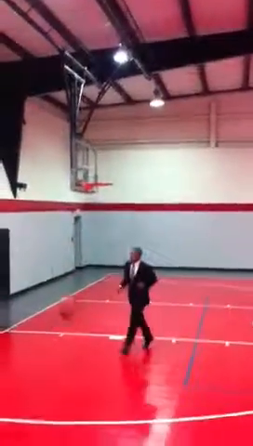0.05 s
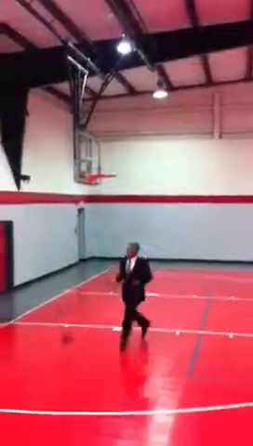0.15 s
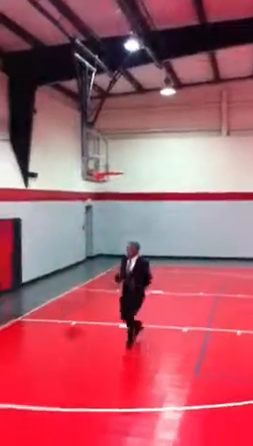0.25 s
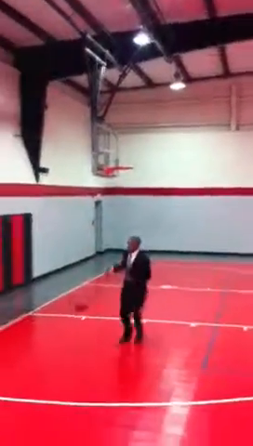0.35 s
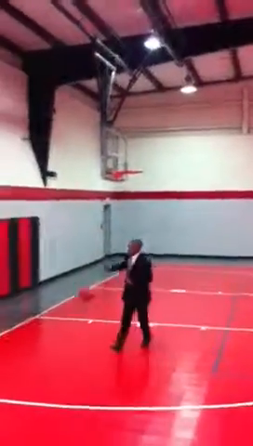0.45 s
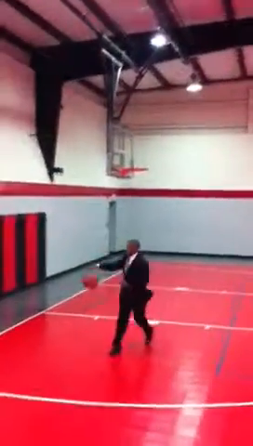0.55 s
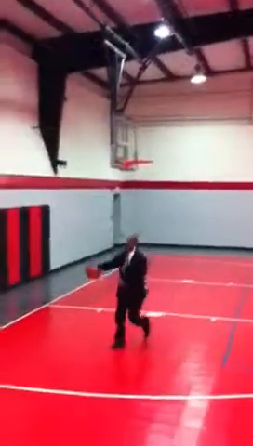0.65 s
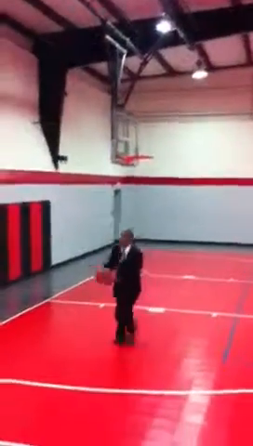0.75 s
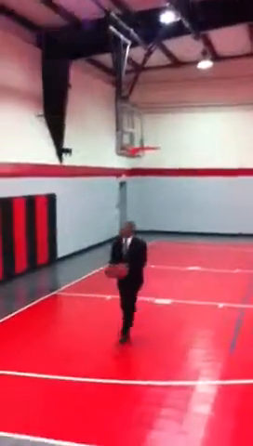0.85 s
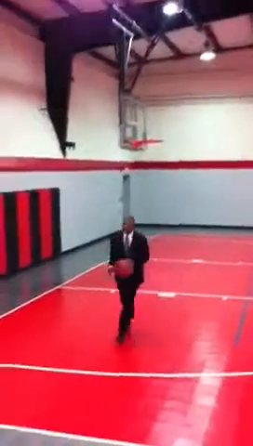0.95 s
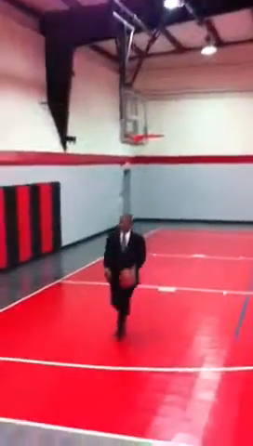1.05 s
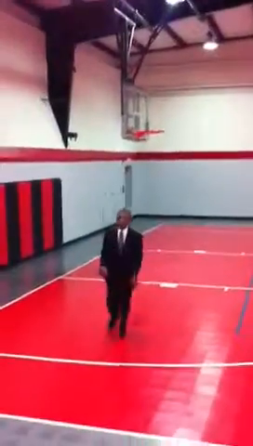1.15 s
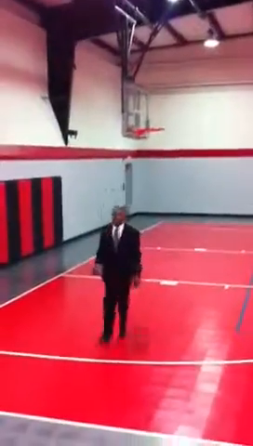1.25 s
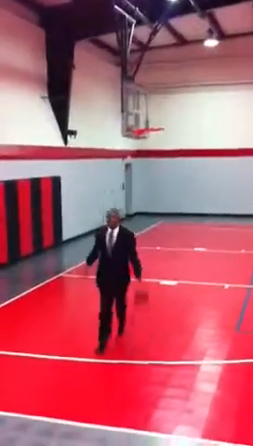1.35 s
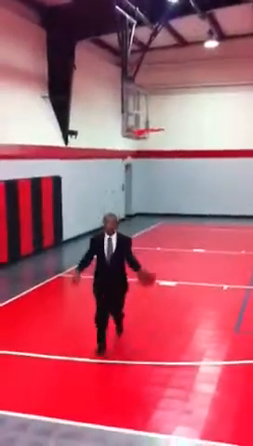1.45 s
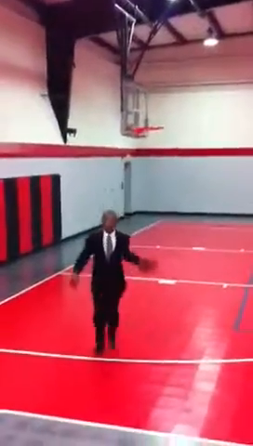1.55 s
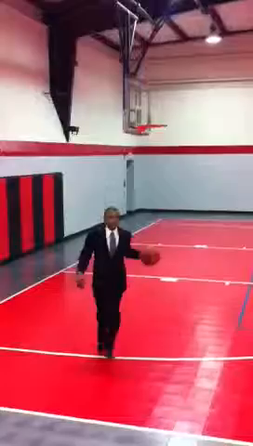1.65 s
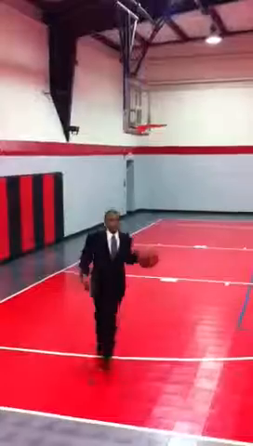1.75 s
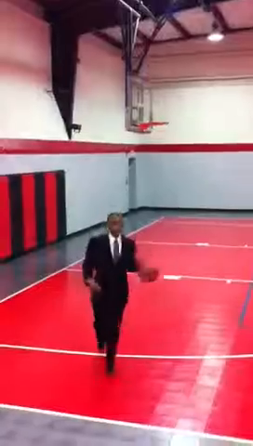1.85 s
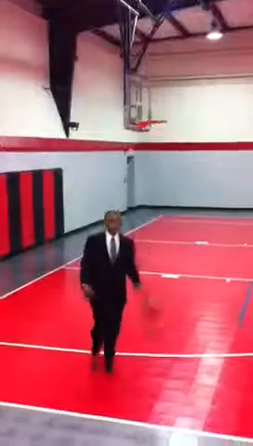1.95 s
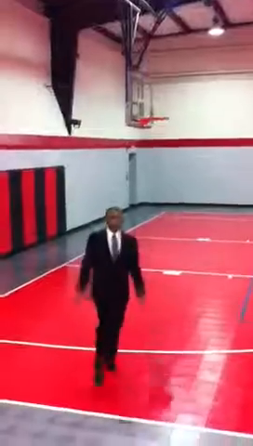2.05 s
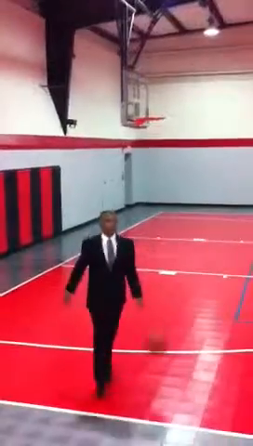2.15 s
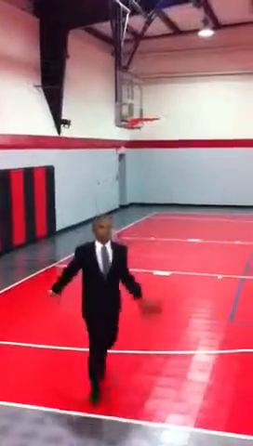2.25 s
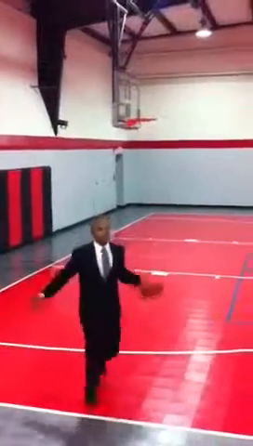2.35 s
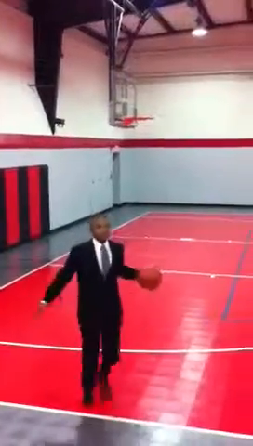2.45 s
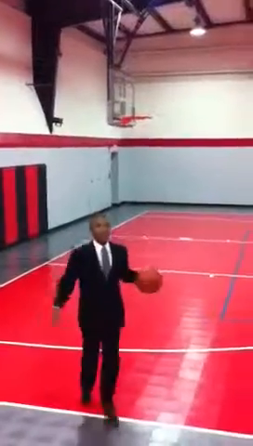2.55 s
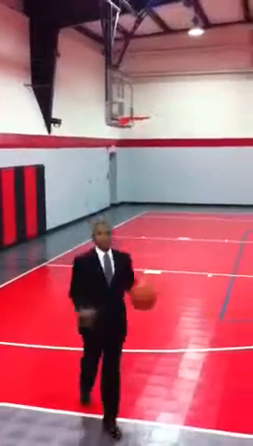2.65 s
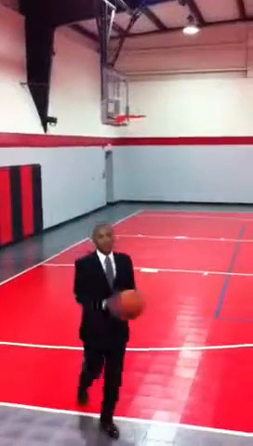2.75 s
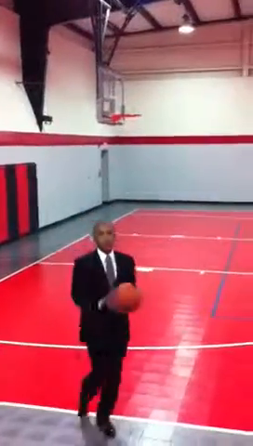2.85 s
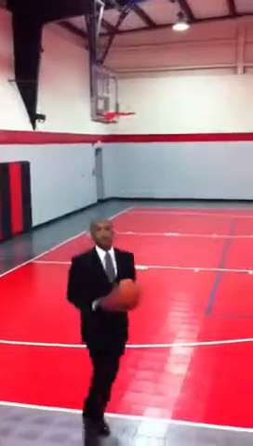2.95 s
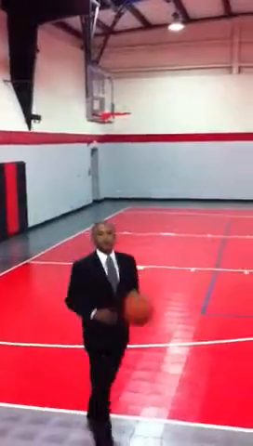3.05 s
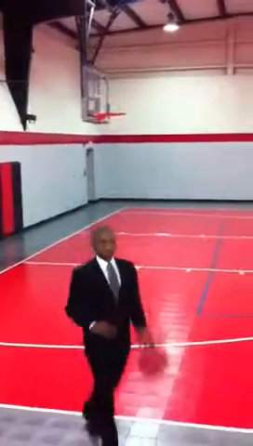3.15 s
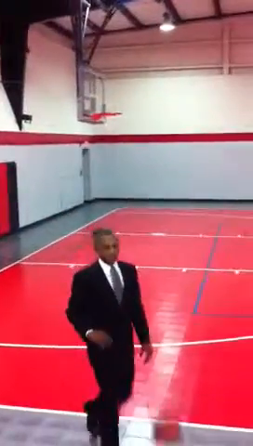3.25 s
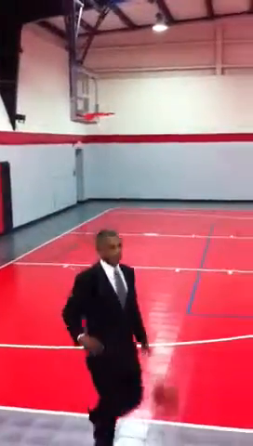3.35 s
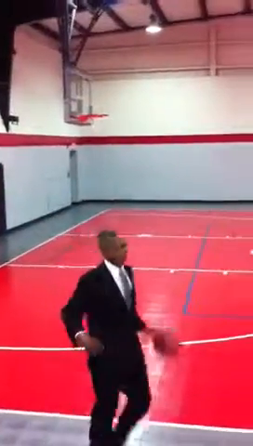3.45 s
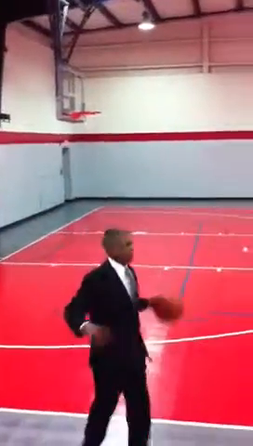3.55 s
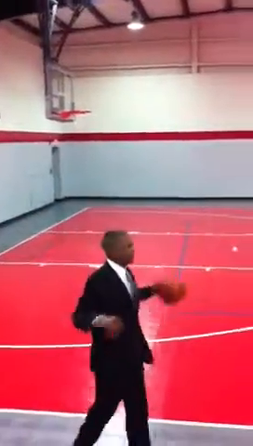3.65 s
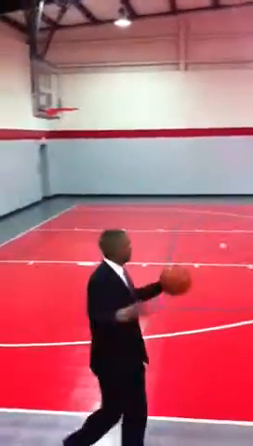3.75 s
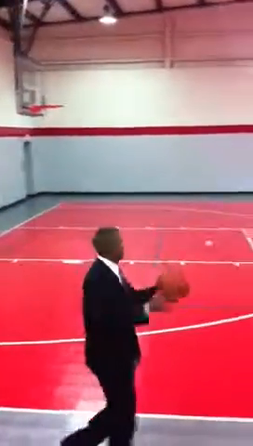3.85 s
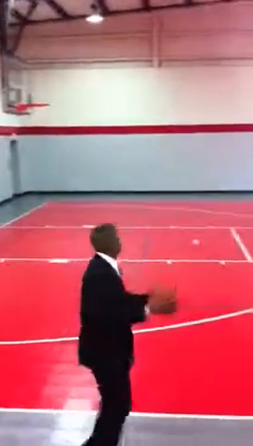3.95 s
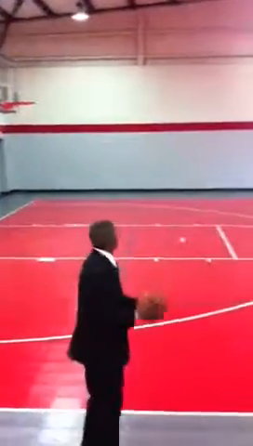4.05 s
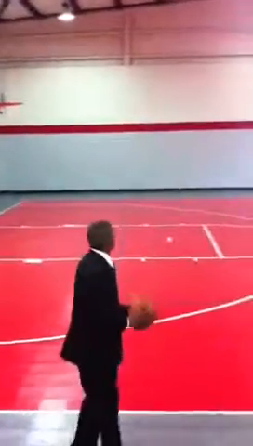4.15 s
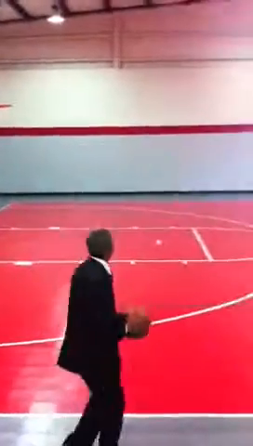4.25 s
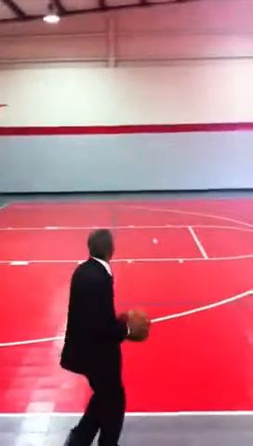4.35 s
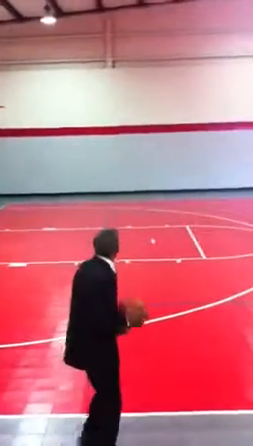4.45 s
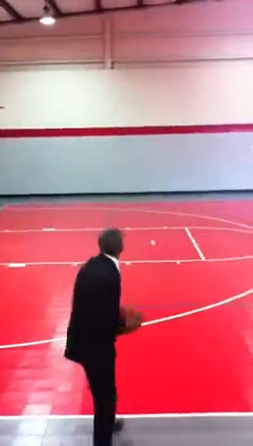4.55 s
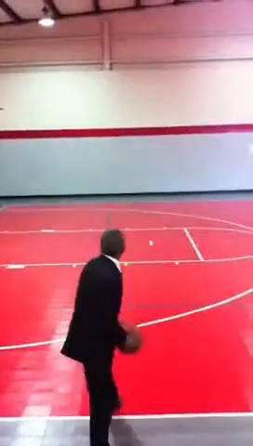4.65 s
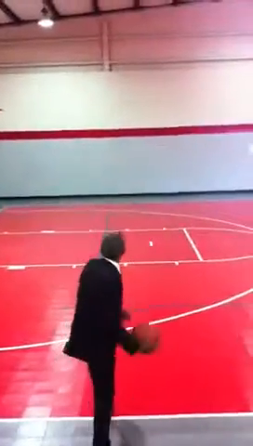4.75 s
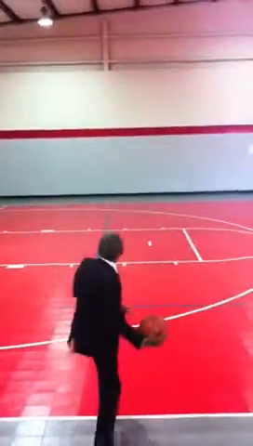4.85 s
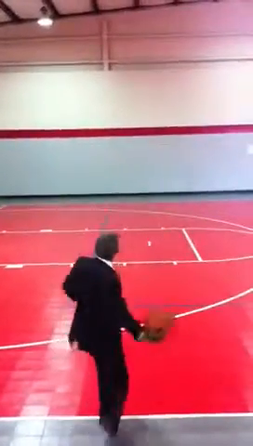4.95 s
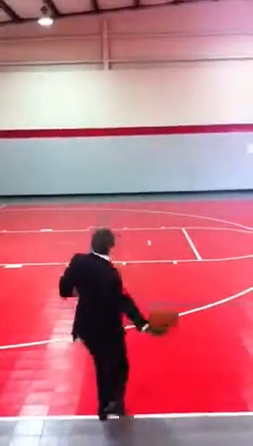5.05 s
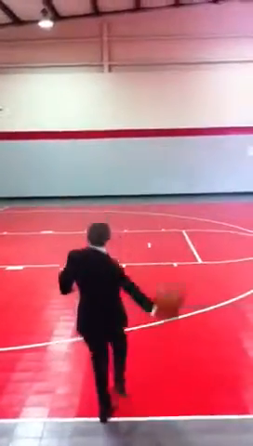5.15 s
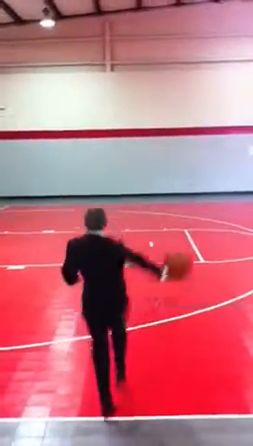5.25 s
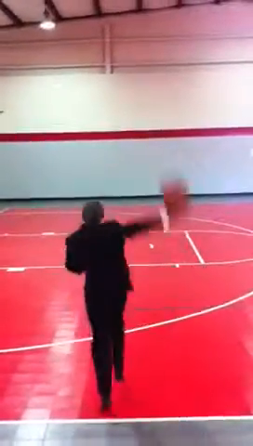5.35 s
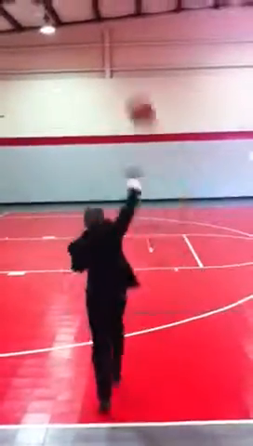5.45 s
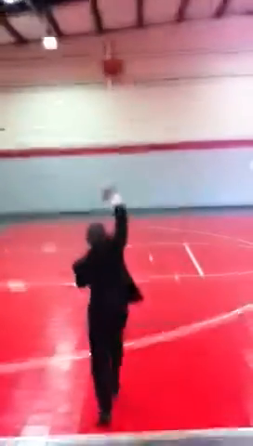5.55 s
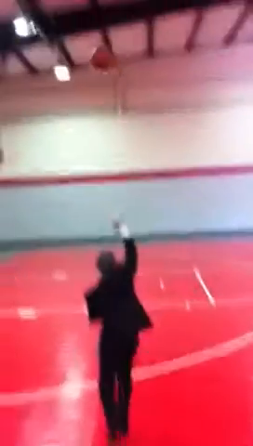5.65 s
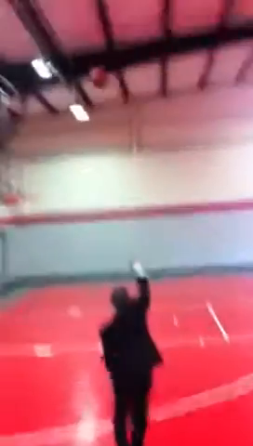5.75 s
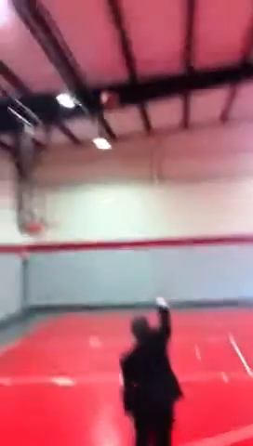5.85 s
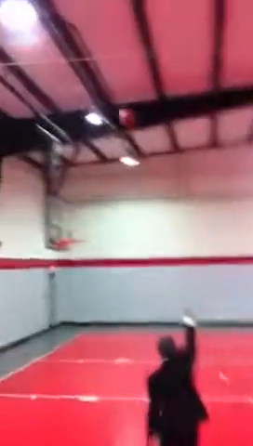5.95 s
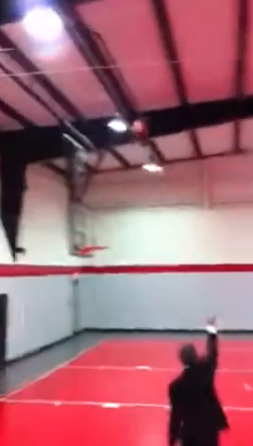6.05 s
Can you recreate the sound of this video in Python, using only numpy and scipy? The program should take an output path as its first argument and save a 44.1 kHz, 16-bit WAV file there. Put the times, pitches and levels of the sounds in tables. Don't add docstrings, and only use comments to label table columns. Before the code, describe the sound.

A basketball thumps and rings four times in a big echoing gym, with hard shoes clacking and two slapping catches over faint hum.

```python
import sys
import numpy as np
from scipy import signal
from scipy.fft import rfft, irfft, next_fast_len
from scipy.io import wavfile

SR = 44100
rng = np.random.default_rng(int(sys.argv[2]) if len(sys.argv) > 2 else 0)


def amplitude_ratio(level_db):
    exponent = np.asarray(level_db, float) / 20
    return 10 ** exponent


def wav_out(sig):
    wavfile.write(sys.argv[1], SR, np.round(np.clip(np.atleast_2d(sig).T, -1, 1) * 32767).astype(np.int16))


N = 269406

# pitch in Hz, level in dB rms.
HUM_TONES = [(118, -92.5), (120, -64), (236, -75.5), (295.5, -64.5)]
# frequency in Hz, level in dB per Hz.
NOISE_COLOUR = [(24, -27), (40, -16), (64, -24), (85, -16), (109, -8), (133, -7), (198, -7), (296, -4.5),
                (343, -10.5), (552, -16.5), (824, -16.5), (1010, -20.5), (5650, -26), (10600, -29.5),
                (15700, -27.5)]
NOISE_DB = -62.5

# frequency in Hz, time to fade by 60 dB in seconds, level in dB.
HALL_TAIL = [(61, 1.7, -10), (131, 1.5, 11.5), (254, 1.36, 1), (400, 1.02, 0.5), (700, 0.95, 8.5),
             (1150, 1.59, 8.5), (1870, 1.56, 10), (3970, 1.34, 5.5), (8000, 0.57, 39)]

# time in seconds, peak in dB, tile pitch in Hz, sole over peak in dB.
HEEL_STEPS = [(0.296, -50.5, 404, -3), (0.348, -46, 394, 1), (1.102, -54.5, 382, -18),
              (1.171, -54, 340, -11), (1.981, -54.5, 372, -0.5), (2.733, -52, 406, -24),
              (3.289, -46.5, 400, -10), (3.736, -51, 440, -7), (4.801, -52.5, 400, -15),
              (4.941, -60, 410, -20), (5.712, -47.5, 360, -20), (6.033, -55.5, 383, -18)]
# time in seconds, peak in dB, tile pitch in Hz, sole over peak in dB.
TOE_TAPS = [(1.07, -52.5, 310, -13.5), (1.909, -53.5, 360, -13), (3.36, -50.5, 434, -19),
            (4.255, -67, 350, 8), (4.312, -47, 395, -23), (4.359, -47.5, 300, -17),
            (5.046, -56.5, 377, -22)]
# time in
# seconds, peak in dB, tile pitch in Hz, sole over peak in dB, snap over peak in dB.
EDGE_STEPS = [(0.723, -48.5, 374, -1, -12), (0.858, -50.5, 424, -20, -1), (0.953, -40.5, 414, -23, -5),
              (2.839, -51, 403, 1, 5.5), (3.807, -52.5, 344, -9, 2), (4.197, -52.5, 560, -3.5, -12),
              (5.653, -49, 306, -10, 0)]

# time in seconds, thump in dB, skin slap over thump in dB,
# low air ring in Hz, high air ring in Hz.
DRIBBLES = [
    (0.3973, -39.5, 3, 704, 1400),
    (1.4047, -36, -2.5, 830, 1370),
    (2.2611, -36.5, 4, 750, 1370),
    (3.461, -36, 2.5, 790, 1230),
]
# time in seconds, thump in dB, skin slap over thump in dB,
# low air ring in Hz, high air ring in Hz.
CATCHES = [
    (2.9070, -27.5, -11, 794, 1375),
    (4.0858, -34.5, -15, 960, 1230),
    (4.0905, -39, -25, 996, 1200),
]
# thump in Hz, boom share of the thump, knock in Hz, then dB over the thump for
ON_FLOOR = (117.5, 0.37, 326.5, 8, 4.5, 4, 1, -22)
# thump in Hz, boom share, knock in Hz, then knock, low, high, top, ping in dB.
IN_HANDS = (279, 0.26, 358, 4.5, 4, 1.8, -3.5, -19.5)
# thump, knock, air and slap, all in dB.
FLOOR_TAIL = (1.8, 6, 2, 1.7)
# thump, knock, air and slap, all in dB.
HANDS_TAIL = (0.92, -1.6, -2.1, -1)
# extra path in metres, level against the blow in dB, dulling in Hz.
FLOOR_ECHOES = [(4.93, -8, 3000), (10.61, -9, 690), (15.44, -21, 1600), (69, -20, 190)]
# extra path in metres, level against the blow in dB, dulling in Hz.
HANDS_ECHOES = [(7, -9.5, 1160), (12.5, -11, 2500), (17, -24, 690)]

FAR_WALL_M, NEARING_M_PER_S, NEAREST_M = 51, 12.5, 34.3
FAR_WALL_DB, FAR_WALL_HZ = -25, 1590
SOUND_M_PER_S = 343


def rms_one(x):
    return x / np.sqrt(np.mean(x ** 2) + 1e-20)


def peak_one(x):
    return x / np.abs(x).max()


def at_hz(points, hz, column=1):
    table = np.array(points)
    return np.interp(np.log(hz + 1), np.log(table[:, 0]), table[:, column])


def add(track, sound, s):
    i = max(round(s * SR), 0)
    track[i:i + len(sound)] += sound[:N - i]


def filtered(x, order, hz, kind="low"):
    return signal.sosfilt(signal.butter(order, hz, kind, fs=SR, output="sos"), x)


def contact(length_s, rough, soft_hz):
    t = np.arange(SR * 15 // 100) / SR
    force = rough * rng.standard_normal(len(t)) * np.exp(-t / length_s)
    force[0] += 1
    return -filtered(force, 2, soft_hz)


def ring(force, hz, t60):
    decay = amplitude_ratio(-60 / (t60 * SR))
    turn = 2 * np.pi * hz / SR
    return peak_one(signal.lfilter([1, 0, -1], [1, -2 * decay * np.cos(turn), decay ** 2], force + 1e-18))


def hall_response(build_s, sources=((1,),)):
    t = np.arange(SR * 5 // 4) / SR
    hz = np.fft.rfftfreq(len(t), 1 / SR)
    colour = np.sqrt(np.sum(np.abs(rfft(sources, len(t))) ** 2, axis=0))
    noise = colour * rfft(rng.standard_normal(len(t)))
    tail = np.zeros(len(t))
    for centre in 50 * 2 ** np.arange(0, 7.6, 0.5):
        share = np.clip(1 - 2 * np.abs(np.log2((hz + 1) / centre)), 0, 1)
        fade_db = at_hz(HALL_TAIL, centre, column=2) - 60 * t / at_hz(HALL_TAIL, centre)
        tail += irfft(noise * share, len(t)) * amplitude_ratio(fade_db)
    flutter_db = 1.7 * np.interp(t, np.arange(80) / 60, rng.standard_normal(80))
    build_up = 1 - np.exp(-(t / build_s) ** 2)
    return tail * amplitude_ratio(flutter_db) * build_up / np.sqrt(SR)


def hum():
    t = np.arange(N) / SR
    waver_db = 1.26 * np.interp(t, np.arange(40) / 6, rng.standard_normal(40))
    out = np.zeros(N)
    for hz, db in HUM_TONES:
        tone = np.sin(2 * np.pi * (hz * t + rng.random()))
        out += np.sqrt(2) * amplitude_ratio(db + waver_db) * tone
    return out


def air_and_hiss():
    size = next_fast_len(N)
    colour = amplitude_ratio(at_hz(NOISE_COLOUR, np.fft.rfftfreq(size, 1 / SR)))
    noise = irfft(rfft(rng.standard_normal(size)) * colour, size)[:N]
    return amplitude_ratio(NOISE_DB) * rms_one(noise)


def footfall(peak_db, tile_hz, sole_db, snap_db, sole_hz):
    heel = contact(0.0055, 0.49, soft_hz=457)
    sole = contact(0.0044, 0.2, soft_hz=1600)
    edge = contact(0.004, 0.5, soft_hz=3000)
    knock = amplitude_ratio(peak_db + 6.5) * ring(heel, tile_hz, 0.033)
    thud = amplitude_ratio(peak_db - 5.5) * ring(heel, 228, 0.19)
    clack = amplitude_ratio(peak_db + sole_db + 8) * ring(sole, sole_hz, 0.023)
    snap = amplitude_ratio(peak_db + snap_db) * ring(edge, 1400, 0.003)
    return knock + thud + clack + snap


def steps():
    landings = [(*row, -22, 727) for row in HEEL_STEPS]
    landings += [(*row, -9, 1110) for row in TOE_TAPS]
    landings += [(*row, 730) for row in EDGE_STEPS]
    out = np.zeros(N)
    for s, *settings in landings:
        add(out, footfall(*settings), s - 0.001)
    wall_delay = SR // 45
    out[wall_delay:] += amplitude_ratio(-13.5) * out[:-wall_delay]
    return out + signal.fftconvolve(out, hall_response(0.0066))[:N]


def bounce_parts(row, kind, rough):
    s, thump_db, slap_db, low_hz, high_hz = row
    thump_hz, boom, knock_hz, knock_db, low_db, high_db, top_db, ping_db = kind
    push = ring(contact(0.001, rough / 4, soft_hz=280), thump_hz, 0.036)
    push = push + boom * ring(contact(0.0086, rough / 4, soft_hz=340), 189.6, 0.063)
    knock = ring(contact(0.0026, rough, soft_hz=695), knock_hz, 0.029)
    force = contact(0.0087, rough, soft_hz=2700)
    air = amplitude_ratio(low_db + 3.5) * ring(force, low_hz, 0.0076)
    air = air - amplitude_ratio(high_db + 2.5) * ring(force, high_hz, 0.006)
    air = air + amplitude_ratio(top_db) * ring(force, 1717, 0.0069)
    air = air + amplitude_ratio(ping_db) * ring(force, 1043, 0.19)
    slap = peak_one(filtered(contact(0.0025, 1.2 * rough, soft_hz=2790), 2, [1500, 3400], "band"))
    return amplitude_ratio(thump_db) * np.array([amplitude_ratio(12) * push, amplitude_ratio(knock_db) * knock, air, amplitude_ratio(slap_db) * slap])


def wall_echo(blow, db, dull_hz):
    smear = rms_one(contact(0.0036, 0.72, dull_hz)[:SR // 100])
    return amplitude_ratio(db) * np.abs(blow).max() * peak_one(signal.fftconvolve(blow, smear))


def ball_blows(rows, kind, tail_db, near_echoes):
    out = np.zeros(N)
    for row in rows:
        s = row[0]
        blow = bounce_parts(row, kind, rough=0.11).sum(axis=0)
        add(out, blow, s + 0.0004)
        spread = amplitude_ratio(np.array(tail_db))[:, None] * bounce_parts(row, kind, rough=0)
        add(out, hall_response(0.013, spread), s)
        far_path_m = max(FAR_WALL_M - NEARING_M_PER_S * s, NEAREST_M)
        for path_m, db, dull_hz in [*near_echoes, (far_path_m, FAR_WALL_DB, FAR_WALL_HZ)]:
            add(out, wall_echo(blow, db, dull_hz), s + path_m / SOUND_M_PER_S)
    return out


def ball():
    dribbled = ball_blows(DRIBBLES, ON_FLOOR, FLOOR_TAIL, FLOOR_ECHOES)
    caught = ball_blows(CATCHES, IN_HANDS, HANDS_TAIL, HANDS_ECHOES)
    return dribbled + caught


def scene():
    blows = filtered(steps() + ball(), 4, 95, "high")
    blows = filtered(blows, 1, 4200)
    return (hum() + air_and_hiss() + blows)[None]


def low_pass(x):
    return signal.sosfilt(signal.butter(12, 15890, fs=SR, output="sos"), x)


def record(dry):
    mix = signal.sosfilt(signal.cheby2(20, 60, 16020, fs=SR, output="sos"), dry)
    return low_pass(mix)


dry = scene()
out = record(dry)
wav_out(out)
```